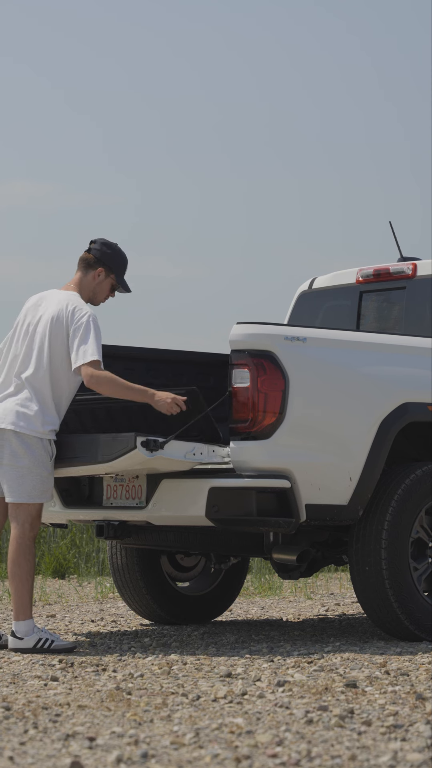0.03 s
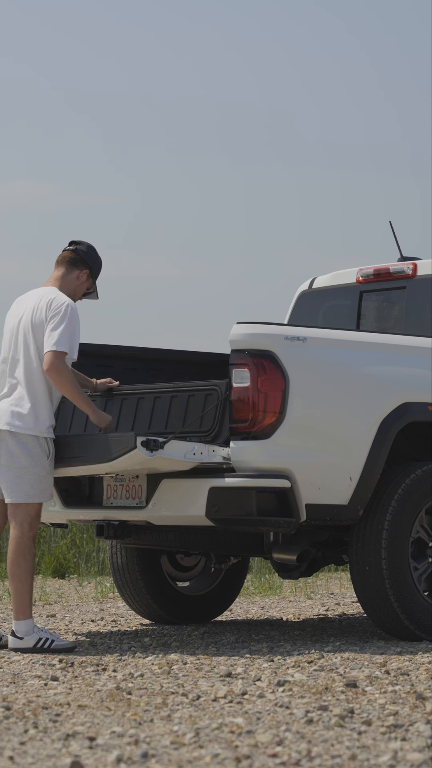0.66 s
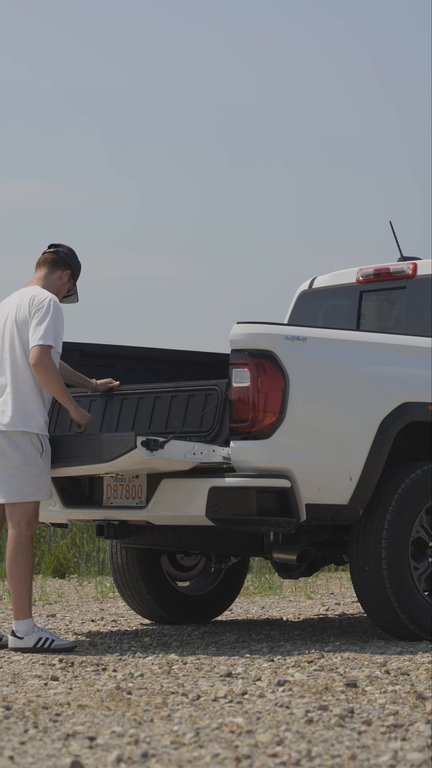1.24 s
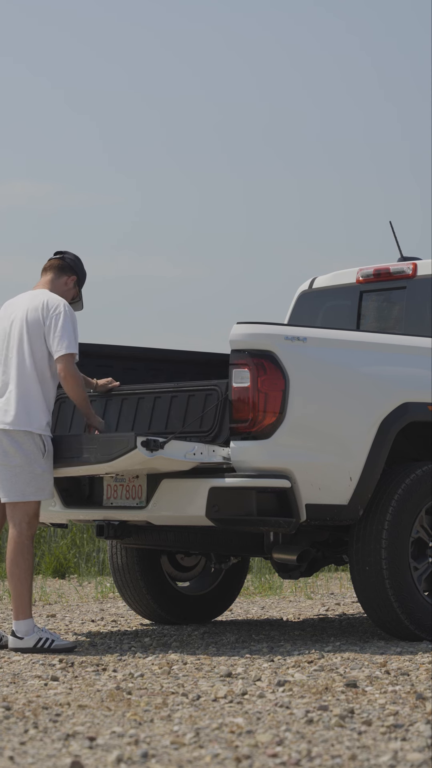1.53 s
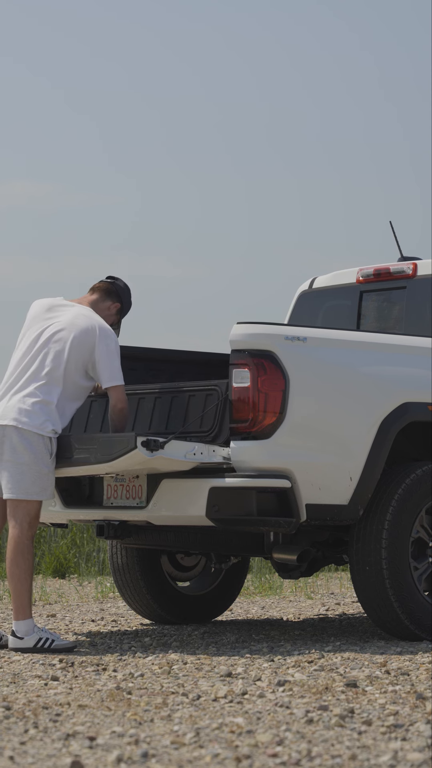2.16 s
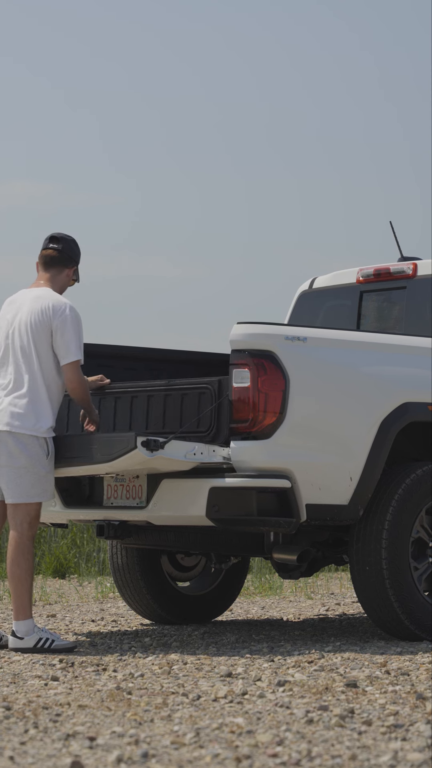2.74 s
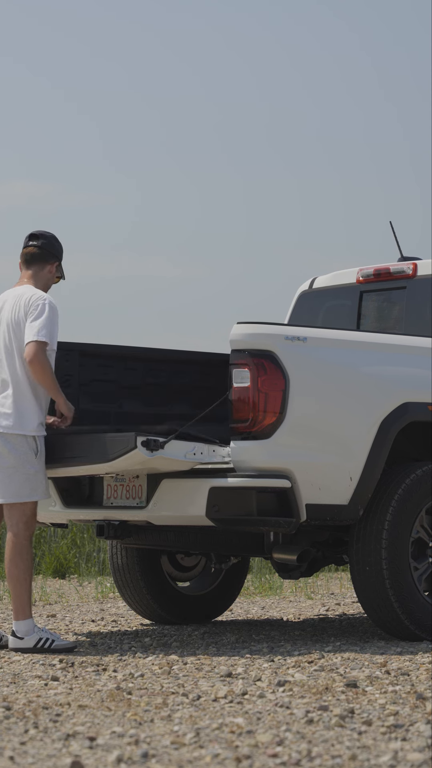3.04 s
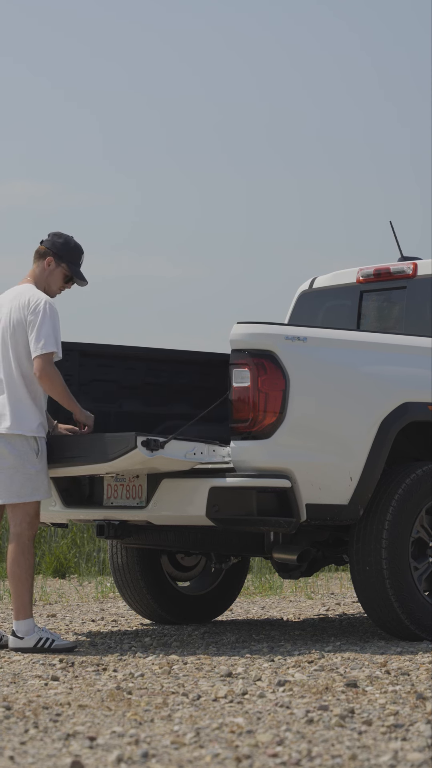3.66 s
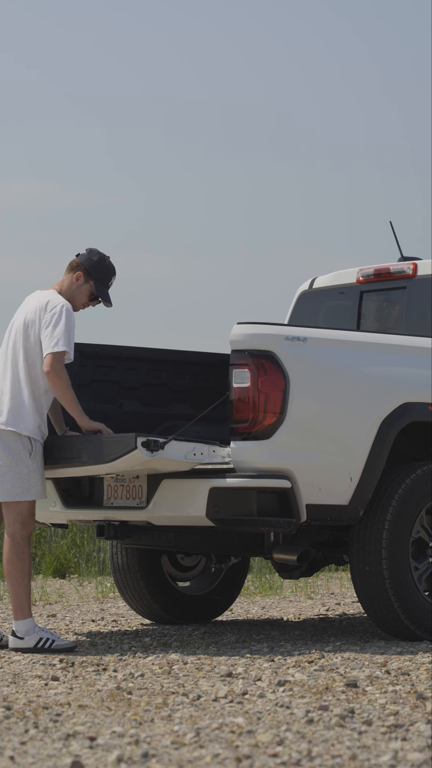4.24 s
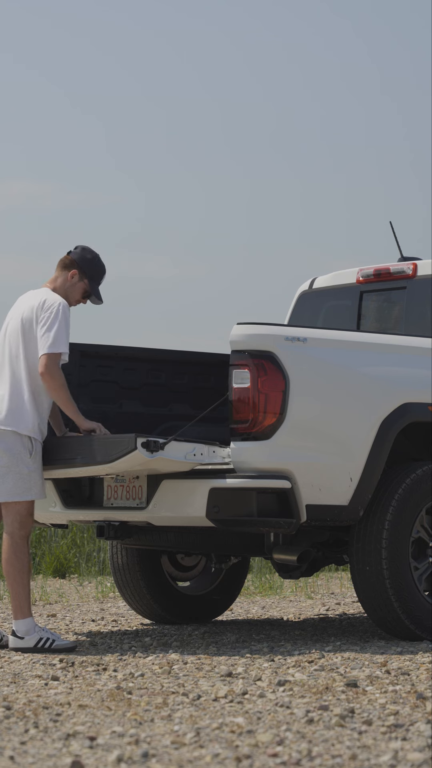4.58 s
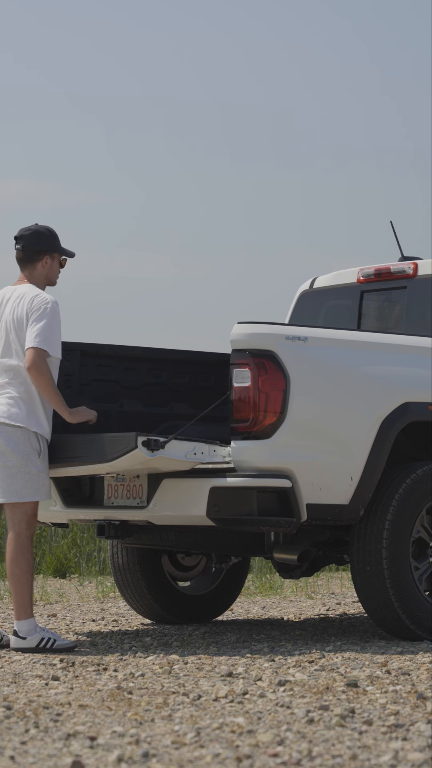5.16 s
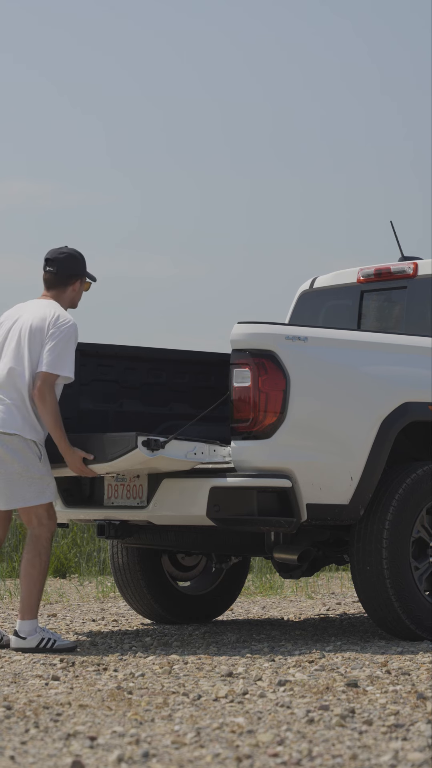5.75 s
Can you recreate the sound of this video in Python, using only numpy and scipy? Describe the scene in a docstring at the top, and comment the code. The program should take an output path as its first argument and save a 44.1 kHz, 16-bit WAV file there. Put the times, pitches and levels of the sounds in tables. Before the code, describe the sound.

Close clunks, clicks and hollow thuds come from a pickup's tailgate and folding seat panel, over a steadily throbbing engine idle.

```python
"""A pickup's engine idles with a low throb, and a man starts clunking about at its tailgate.
He folds a seat panel, latches it and lifts the gate: plastic and steel parts click, rattle and ring,
the hollow gate booms and the panel wobbles. Clothes rustle, a hand slides and a far bird whistles.
The hardest blows overload the close microphone, and its gain control turns the idle down after them."""
import sys
import numpy as np
from scipy import signal
from scipy.fft import rfft, irfft
from scipy.io import wavfile
from scipy.ndimage import map_coordinates

SR = 44100
rng = np.random.default_rng(int(sys.argv[2]) if len(sys.argv) > 2 else 0)


def log_audio(samples):
    """Write samples as a 16-bit WAV file to the path given in sys.argv[1]."""
    # one column per channel
    frames = np.atleast_2d(samples).T
    # limit to full scale, then quantise
    limited = np.clip(frames, -1, 1)
    pcm = np.round(limited * 32767).astype(np.int16)
    wavfile.write(sys.argv[1], SR, pcm)


N = 265036
TIME = np.arange(N) / SR

# the bird's falling whistles: (time [s], length [s], start pitch [Hz], end pitch [Hz], level [dB])
WHISTLES = [(1.195, 0.12, 5630, 4170, -46), (5.27, 0.11, 3770, 2690, -36), (5.285, 0.14, 4250, 2960, -42.5),
            (5.36, .04, 4400, 3650, -45)]
# the idle's firing rate, and how loud it is heard as the gain control dips and recovers:
# (time [s], firing rate [per s], relative level [dB])
IDLE = [(0, 26, 2.5), (.7, 25.7, 1.5), (1.501, 27, 3.5), (2.3, 25.4, 2), (2.999, 27, 2.5),
        (3.65, 26.8, -2.5), (4.401, 27.7, 0.5), (5.201, 25.7, 2), (6, 26.2, 4)]
# tones of the exhaust hum: (multiple of the firing rate [number], relative level [dB])
EXHAUST_TONES = [(1, -14), (2, -1.5), (3, -4.5), (4, -1.5), (5, -1), (6, -9), (7, -15.5), (8, -17.5),
                 (9, -20.5), (10, -11), (11, -15), (12, -36)]
# rushing noise of the engine and open air: (frequency [Hz], relative level [dB])
RUSH_COLOUR = [(20, -42), (45, -1.5), (90, 0), (170, -3), (215, -4.5), (285, -5), (345, -12.5),
               (520, -10.5), (1000, -22), (2400, -34), (4500, -44), (7000, -50.5), (11000, -56),
               (16000, -59)]

# a hand sliding along the gate's plastic liner: (time [s], level [dB])
HAND_LEVELS = [(4.5, -76), (4.7, -54.5), (4.85, -47), (5.0, -49), (5.15, -47), (5.35, -48.5), (5.6, -62),
               (6, -47)]
# the hiss of that hand: (frequency [Hz], relative level [dB])
HAND_COLOUR = [(800, -48), (2000, 10.5), (3500, -1.5), (4600, 3), (5500, 2.5), (7200, -4.5), (9000, -9),
               (16000, -14)]
# strokes of cloth as the man moves: (time [s], length [s], level at the end [dB])
CLOTH_RUBS = [(0, 0.03, -35), (0.087, .21, -46), (1.284, 0.19, -56), (2.501, .17, -54.5),
              (2.705, 0.023, -35), (2.758, 0.017, -39), (2.822, .22, -42), (4.801, .08, -48.5)]
# cloth snagging and letting go: (time [s], level [dB])
CLOTH_SCRATCHES = [(0.017, -27), (0.205, -30), (2.729, -15), (2.774, -19), (2.833, -19), (2.970, -21),
                   (3.009, -25)]
# the hiss of the cloth: (frequency [Hz], relative level [dB])
CLOTH_COLOUR = [(500, -18), (1800, -2.5), (3300, 3), (5500, 2), (7500, 5.5), (10000, 1), (12500, -8.5),
                (15000, -6), (17000, -26)]

# the laid-down panel settling: (time [s], length [s], start pitch [Hz], end pitch [Hz], level [dB])
PANEL_WOBBLE = (3, 0.39, 102.5, 59.5, -2)
# weight landing on the gate: (time [s], push strength [dB], centre pitch [Hz], swing-back strength [dB])
THUDS = [(0.315, -8, 400, -15), (.36, -2, 85, -9), (1.832, -9, 290, -27), (2.611, -17, 600, -22),
         (3.055, 2, 153, -4), (3.068, -7, 380, -13), (3.16, -0.5, 202, -7), (3.275, 1.5, 191, -7),
         (3.852, -5, 185, -4), (3.975, -13, 600, -16), (4.105, -13.5, 610, -29), (4.228, -5, 179, -8),
         (4.3, -0.5, 245, -1.5), (4.478, 2.5, 189, 0), (4.952, -4, 52, -11), (5.114, -4.5, 105, -17),
         (5.57, -9, 171, -14)]
# modes (natural tones) of the gate and liner: (pitch [Hz], time to fade 60 dB [s], relative level [dB])
GATE_MODES = [(37.4, 0.86, 3.5), (58.3, 0.44, 5), (69.45, 0.84, 10.5), (84.4, 0.38, 10.5), (100.36, 0.7, 5),
              (120.2, 0.43, 5), (148.2, 0.35, 4), (205.8, 0.45, 0), (233, 0.62, -7), (267.2, 0.16, 4),
              (301.5, 0.2, 4.5), (377.4, 0.31, -1), (419.6, 0.92, -7), (462, 0.44, -6.5), (514.5, 0.35, -4),
              (590, 0.22, 5), (640.6, 0.15, -2)]

# modes of the small parts, each listed as (pitch [Hz], relative level [dB])
HINGE = [(457, 14.5), (512, 10.5), (733, -0.5), (872, 1), (1287, 19), (2020, 10.5), (2212, 11), (2500, 2.5),
         (2938, -3), (5145, -18), (5749, -21)]  # seat hinge
CATCH = [(597, 5), (924, 11.5), (1106, 12), (1420, 6), (2117, 1), (2384, 6), (3339, 14), (3650, 10.5),
         (5961, 6), (6567, -3)]  # seat catch
STOPS = [(371, 14.5), (458, 11.5), (726, 2), (824, 0), (1294, 8.5), (1530, -10), (2275, 1), (2633, -2),
         (3150, -1), (3320, 4.5), (4190, -5), (4592, -11)]  # seat panel on its stops
LOCKS = [(520, 6), (650, -2.5), (783, 1), (980, -14.5), (1101, 0.5), (1395, 0.5), (1800, 2), (2468, 4.5),
         (3326, 1.5), (3584, -5), (4047, -6), (4924, -8)]  # panel locks
HANDLE = [(353, 7), (599, 5), (678, 10), (897, 0), (1213, 5), (1352, 1), (1832, 11), (1989, 10), (2539, 7),
          (3502, 5), (4105, 5), (4700, 10), (4980, 9), (5400, 7)]  # gate handle
HARDWARE = [(377, 6), (457, -5), (654, 10), (1299, 13.5), (1757, 11.5), (2314, 9), (2957, 7), (3365, 10.5),
            (4000, 11), (4873, 8), (5390, 2), (6721, -15)]  # steel gate fittings
STRIKER = [(870, 13.5), (1290, 19.5), (1800, 14.5), (2606, -3), (3391, 13)]  # steel piece that the latch grabs
# which part is being worked: (start time [s], modes [table])
WORKED_PARTS = [(0, LOCKS), (.325, HINGE), (1, CATCH), (2.5, LOCKS), (3.12, STOPS), (3.33, STRIKER),
                (3.38, STOPS), (3.7, LOCKS), (5.4, HANDLE), (5.7, HARDWARE)]
# the three bands of a blow, a low knock, a middle clack and a high tick:
# (lower edge [Hz], upper edge [Hz], crack decay [s], tail decay [s])
BLOW_BANDS = [(346, 960, 0.0038, 0.023), (1100, 3140, 0.0022, 0.014), (3680, 12800, 0.0016, 0.01)]
# latch, hinge and panel blows: (time [s], knock [dB], clack [dB], tick [dB], slack before the blow [s])
BLOWS = [ (0.301, -1.5, -13, -17.5, 0), (.406, -26, -6, -21.5, 0), (1.400, -26.5, -40, -34, 0.00043),
         (1.509, -17, -36, -37, 0.00036), (1.591, -19, -37.5, -40, 0.00031), (1.832, -11, -32, -37, .021),
         (1.909, -10, -18.5, -18.5, 0.00026), (1.916, -9.5, -14.5, -16, 0.0039),
         (2.611, -18, -43, -48, 0.00047), (3.046, -18.5, -25, -13.5, 0.0018),
         (3.066, -3, -11.5, -12.5, .011), (3.078, -5.5, -12, -13.5, 0.00004),
         (3.162, -24, -17.5, -26, 0.00086), (3.277, -10, -26.5, -45, .014), (3.345, -4, -4, -28, 0.001),
         (3.393, -13, -7, -21, 0.00015), (3.406, -9.5, -5, -11.5, 0.00052), (3.465, -14, -2.5, -9.5, .011),
         (3.559, -14, -16.5, -36, .012), (3.856, -5.5, -23.5, -23, .024), (4.110, -23, -30, -31, 0.0018),
         (4.254, -3.5, -3.5, -4, 0.000039), (4.306, -5.5, -39, -24, 0.0023), (4.479, 0, -12.5, -12.5, 0),
         (5.480, -4.5, -2, -3.5, .007), (5.770, -9, -38, -64, 0.003), (5.8233, -4.5, -18, -19, .01),
         (5.833, -9, -2, -6, 0.00012), (5.978, -4.5, -43, -62, 0)]
# the light touch as a part takes up its slack, at its loudest: (knock [dB], clack [dB], tick [dB])
LIGHT_TOUCH = (-18, -23.5, -28.5)
# loose parts chattering: (time [s], length [s], knock [dB], clack [dB], tick [dB], total fade [dB])
RATTLES = [(0.316, 0.14, -14.5, -18, -43, 1.5), (3.091, .11, -16.5, -17.5, -32, 15),
           (3.418, 0.033, -13, -16, -42, 3), (3.477, .035, -9, -12, -35, 26),
           (3.916, .19, -24, -34.5, -38, 5), (4.229, .115, -14, -35, -45.5, 7),
           (5.495, 0.061, -9, -31, -35, 16.5), (5.846, 0.054, -4, -6, -22.5, 16.5)]


def amp(db):
    """Turns decibels into a number to multiply by."""
    return 10 ** (np.asarray(db) / 20)


def unit(x):
    """Scales a signal to an average size (rms) of 1."""
    return x / np.sqrt(np.mean(x ** 2) + 1e-20)


def add(mix, s, sound):
    """Mixes a sound in, starting at s seconds."""
    part = mix[max(round(s * SR), 0):][:len(sound)]
    part += sound[:len(part)]


def coloured_noise(colour):
    """Noise of rms 1 with the given balance of lows and highs."""
    hz, db = np.transpose(colour)
    gain = amp(np.interp(np.log(np.fft.rfftfreq(N, 1 / SR) + 1), np.log(hz), db))
    return unit(irfft(rfft(rng.standard_normal(N)) * gain, N))


def wander(per_s):
    """A smooth random drift of size about 1, passing through per_s new values a second."""
    return map_coordinates(rng.standard_normal(2048), [TIME * per_s], order=2, mode="wrap")


def band(x, lo_hz, hi_hz):
    """Keeps the sound between two frequencies."""
    return signal.sosfilt(signal.butter(2, [lo_hz, hi_hz], "band", fs=SR, output="sos"), x)


def glide(length, start_hz, end_hz, fade_power=1):
    """A sliding tone that fades in and out; a smaller fade_power keeps it loud for longer."""
    hz = np.linspace(start_hz, end_hz, int(length * SR))
    return np.hanning(len(hz)) ** fade_power * np.sin(2 * np.pi * np.cumsum(hz) / SR)


def bird():
    """A far bird gives thin whistles that slide down."""
    out = np.zeros(N)
    for s, length, start_hz, end_hz, db in WHISTLES:
        add(out, s, amp(db) * glide(length, start_hz, end_hz))
    return out


def engine(hum_db=-15, rush_db=-24, smear=2.2, unevenness=0.25, jitter=0.066, throb=0.036, swell_db=1.34):
    """Exhaust pulses, smeared by the pipe, hum over a rush that throbs with each firing."""
    times, firing_rate, level_db = np.transpose(IDLE)
    angle = 2 * np.pi * np.cumsum(np.interp(TIME, times, firing_rate)) / SR
    hum = np.zeros(N)
    for k, db in EXHAUST_TONES:
        # no two firings are alike: each tone wavers in size and timing
        size = amp(db) * (1 + unevenness * wander(7.6))
        hum += size * np.cos(k * angle - smear * k ** 2 + jitter * k * wander(15))
    rush = coloured_noise(RUSH_COLOUR) * (1 + throb * np.cos(angle)) * amp(swell_db * wander(7))
    return amp(np.interp(TIME, times, level_db)) * (amp(hum_db) * unit(hum) + amp(rush_db) * rush)


def sliding_hand(grain_db=2.0):
    """Skin hisses softly over the textured plastic."""
    level_db = np.interp(TIME, *np.transpose(HAND_LEVELS)) + grain_db * wander(70)
    return amp(level_db) * coloured_noise(HAND_COLOUR)


def cloth(build_db=5, release_s=0.014, snags_per_s=40, snag_db=4, spread_db=8, grain_db=5.0):
    """Fibres catch and slip: grainy strokes build up and let go, with sharp scratches."""
    rub = np.zeros(N)
    for s, length, db in CLOTH_RUBS:
        build = amp(db + build_db * np.minimum((TIME - s) / length - 1, 0))
        release = np.exp(-np.maximum(TIME - s - length, 0) / release_s)
        rub += (TIME >= s) * build * release
    sizes = amp(snag_db + spread_db * np.minimum(rng.exponential(1, N), 2))
    snags = rub * sizes * (rng.random(N) < snags_per_s / SR)
    for s, db in CLOTH_SCRATCHES:
        add(snags, s, amp([db]))
    t = np.arange(SR // 8) / SR
    slip_shape = np.exp(-t / 0.00069) + amp(-14) * np.exp(-t / 0.007)  # a snap, then a faint tail
    slips = signal.oaconvolve(snags, slip_shape)[:N]
    grain = unit(amp(grain_db * wander(260)))
    return (rub * grain + slips) * coloured_noise(CLOTH_COLOUR)


def seat_panel(unsteady_db=1.0):
    """The wide plastic sheet flexes: a low, unsteady boom that sinks in pitch."""
    s, length, start_hz, end_hz, db = PANEL_WOBBLE
    out = np.zeros(N)
    add(out, s, amp(db) * glide(length, start_hz, end_hz, fade_power=0.175))
    return out * amp(unsteady_db * wander(24.93))


def contacts(min_slack_s=0.004, chatter_gap_s=0.018, gap_scatter=0.12):
    """Parts touch, strike and chatter: lists (time [s], knock [dB], clack [dB], tick [dB])."""
    hits = []
    for s, *levels_db, slack_s in BLOWS:
        hits.append((s, *levels_db))
        if slack_s > min_slack_s:
            hits.append((s - slack_s, *np.minimum(LIGHT_TOUCH, levels_db)))
    for s, length, *levels_db, fade_db in RATTLES:
        for after in np.arange(0, length, chatter_gap_s):
            late = chatter_gap_s * gap_scatter * rng.standard_normal()
            faded_db = np.array(levels_db) - fade_db * after / length
            hits.append((s + after + late, *faded_db))
    return hits


def gate_pushes(hits, swing_delay_s=0.03, lowest_hz=79.5, liner_db=-6.5, liner_hz=366):
    """Thuds, swings on the cables and knocks on the liner: lists (time [s], level [dB], pitch [Hz])."""
    thuds = [(s, db, hz) for s, db, hz, _ in THUDS]
    swings = [(s + swing_delay_s, db, max(hz / 2, lowest_hz)) for s, _, hz, db in THUDS]
    knocks = [(s, knock_db + liner_db, liner_hz) for s, knock_db, _, _ in hits]
    return thuds + swings + knocks


def hollow_gate(hits, reach_octaves=0.54, rise_s=0.0042, level_db=-1):
    """A push wakes the gate's modes near its own pitch; how hard it pushes only sets how loud they ring."""
    t, out = np.arange(SR // 2) / SR, np.zeros(N)
    hz, ring_s, db = np.transpose(GATE_MODES)
    sign = (-1) ** np.arange(len(hz))  # neighbouring modes swing opposite ways
    shapes = (1 - np.exp(-t / rise_s)) * np.exp(-np.log(1000) * t / ring_s[:, None])
    modes = np.sin(2 * np.pi * np.outer(hz, t)) * shapes
    for s, push_db, push_hz in gate_pushes(hits):
        nearness = np.exp(-0.5 * (np.log2(hz / push_hz) / reach_octaves) ** 2)
        share = sign * amp(db) * nearness
        add(out, s, amp(push_db + level_db) * (share / np.linalg.norm(share)) @ modes)
    return out


def blow(t, levels_db, rise_s=0.0008, bright_hz=10500):
    """Two parts meet: a short crack and a buzzing tail of noise in each of three bands."""
    # loose parts can only buzz so much, so a louder blow has a smaller share of tail
    tail_db = -15 - 0.4 * max(levels_db)
    # soft contacts, with less tick than clack, start slower, last longer and sound duller
    _, clack_db, tick_db = levels_db
    softness = np.clip(clack_db - tick_db, 0, 15)
    top_hz = max(bright_hz * 2 ** (-0.13 * softness), 5000)
    attack = 1 - np.exp(-t / (rise_s * 2 ** (0.18 * softness)))
    stretch = 2 ** (0.0072 * softness)
    out = np.zeros(len(t))
    for db, (lo_hz, hi_hz, crack_s, tail_s) in zip(levels_db, BLOW_BANDS):
        shape = attack * (np.exp(-t / (crack_s * stretch)) + amp(tail_db) * np.exp(-t / tail_s))
        burst = band(shape * rng.standard_normal(len(t)), lo_hz, min(hi_hz, top_hz))
        out += amp(db) * burst * np.linalg.norm(shape) / np.linalg.norm(burst)
    return out


def part_ring(t, part, ring_s_at_1khz=0.04, ring_db=-2.0, spot_spread_db=3):
    """A part is struck at a random spot, so its modes ring in a new balance each time."""
    hz, db = np.transpose(part)
    damping = np.log(1000) / ring_s_at_1khz * (hz / 1e3) ** 0.67  # high modes die sooner
    modes = np.cos(2 * np.pi * np.outer(hz, t)) * np.exp(-np.outer(damping, t))
    spot_db = spot_spread_db * rng.standard_normal(len(hz))
    return (amp(db + ring_db + spot_db) * 2 * damping / SR) @ modes


def latches(hits, level_db=-1.0):
    """Latches, hinge and panel click and rattle: each blow rings the part being worked."""
    t, out = np.arange(SR // 4) / SR, np.zeros(N)
    for s, *levels_db in hits:
        part = [modes for start, modes in WORKED_PARTS if start <= s][-1]
        strike = blow(t, levels_db)
        ring = signal.fftconvolve(strike, part_ring(t, part))[:len(t)]
        add(out, s, strike + ring)
    return amp(level_db) * out


def scene():
    """Everything at one close microphone, with no room around it."""
    hits = contacts()
    background = bird() + engine()
    man = sliding_hand() + cloth()
    tailgate = seat_panel() + hollow_gate(hits) + latches(hits)
    return (background + man + tailgate)[None]


def record(dry, threshold_db=-18.0, duck_share=0.3, memory_s=0.98, fall_db_per_s=6, ceiling=0.86):
    """Gain control dips after loud sounds and slowly recovers; peaks overload; the top treble is cut."""
    keep = np.exp(-1 / (memory_s * SR))
    power_db = 10 * np.log10(signal.lfilter([1 - keep], [1, -keep], dry[0] ** 2) + 1e-12)
    fall_db = TIME * fall_db_per_s
    held_db = np.maximum.accumulate(power_db + fall_db) - fall_db  # holds each peak, then sinks
    ducked = dry * amp(-duck_share * np.maximum(held_db - threshold_db, 0))
    clipped = ducked / (1 + (ducked / ceiling) ** 6) ** (1 / 6)
    treble_cut = signal.firwin(401, cutoff=16000, window=("kaiser", 7), fs=SR)
    return signal.oaconvolve(clipped, treble_cut[None], "same")


dry = scene()
out = record(dry)
log_audio(out)
```